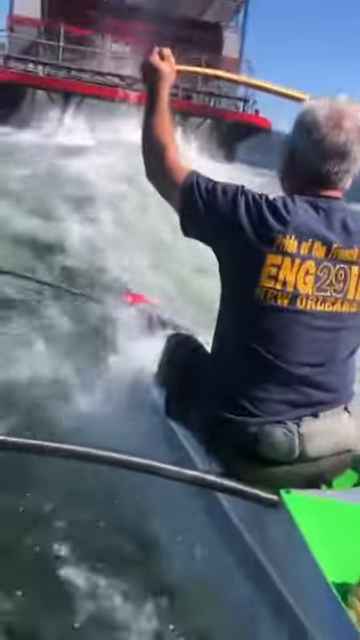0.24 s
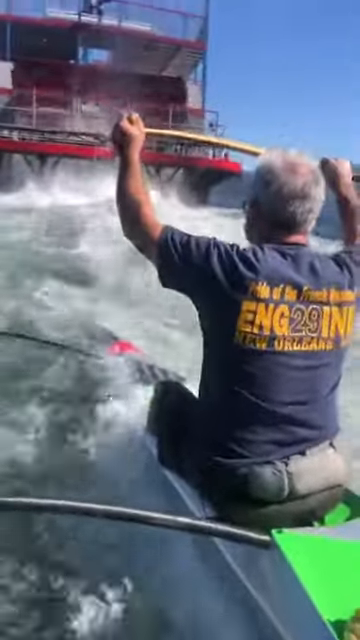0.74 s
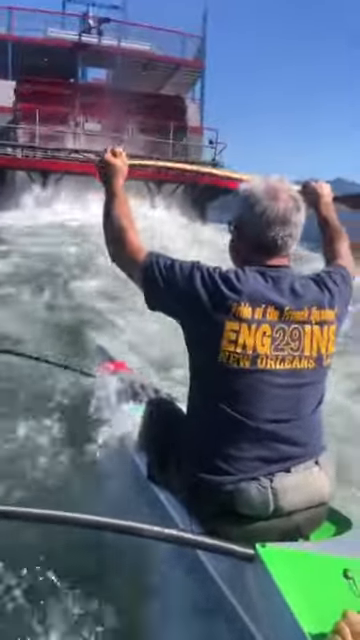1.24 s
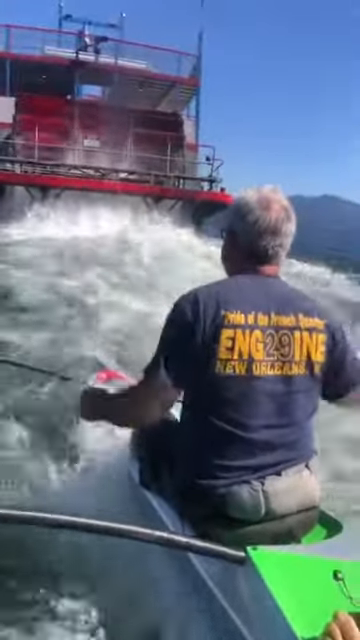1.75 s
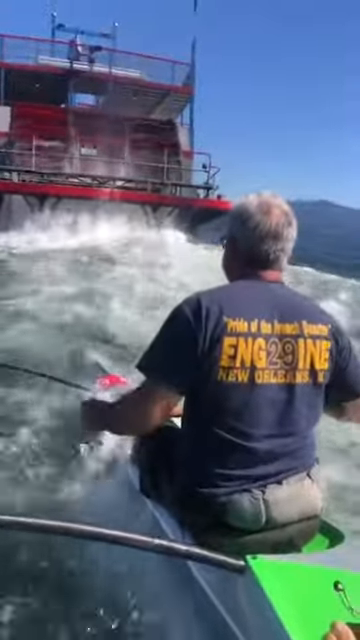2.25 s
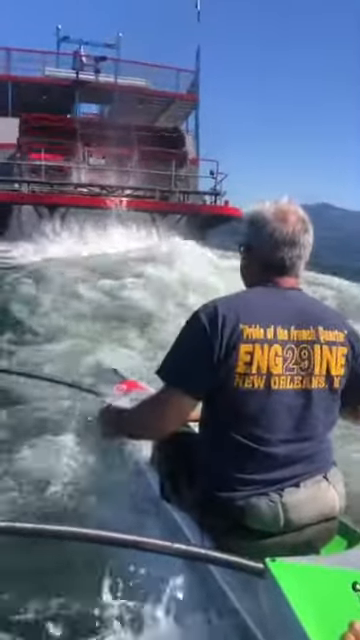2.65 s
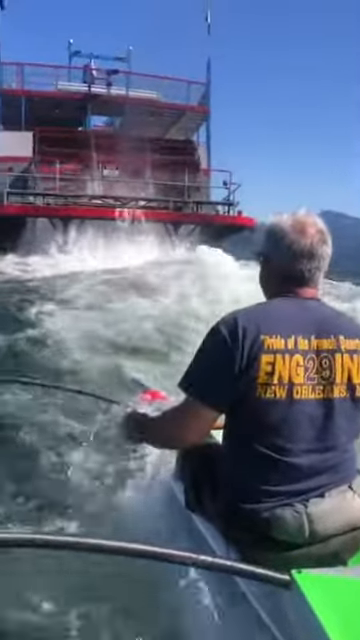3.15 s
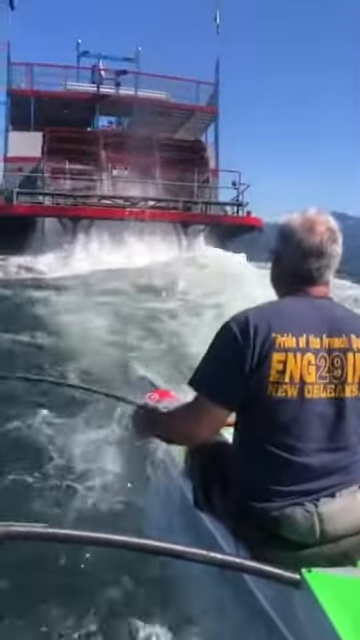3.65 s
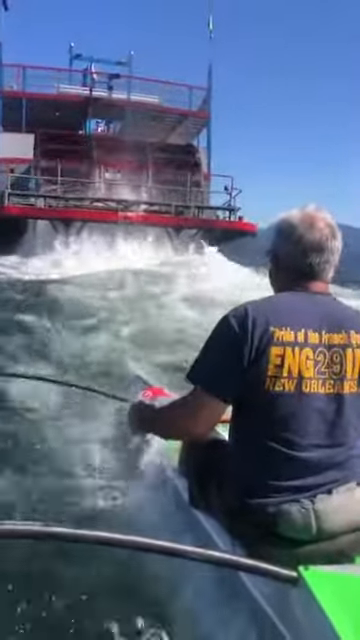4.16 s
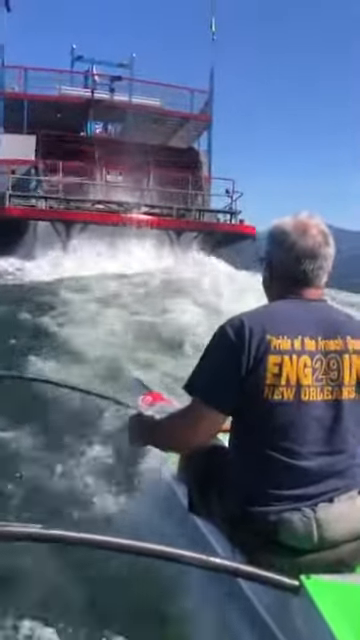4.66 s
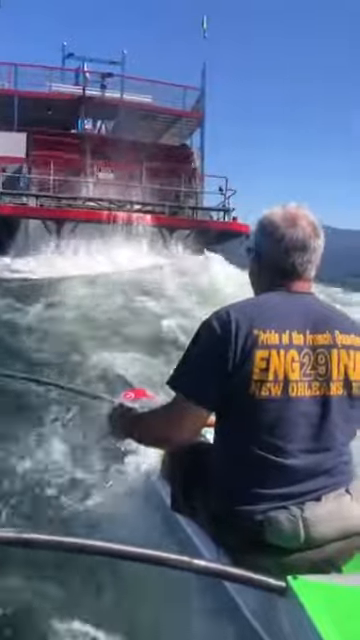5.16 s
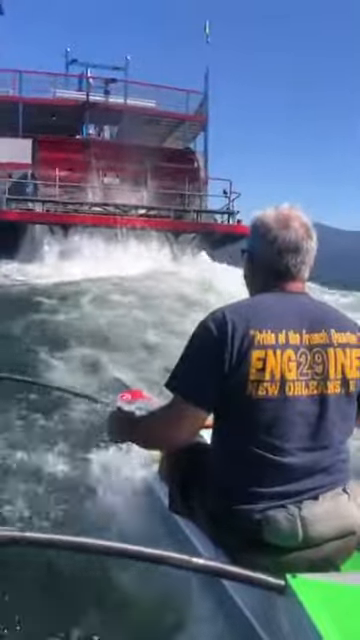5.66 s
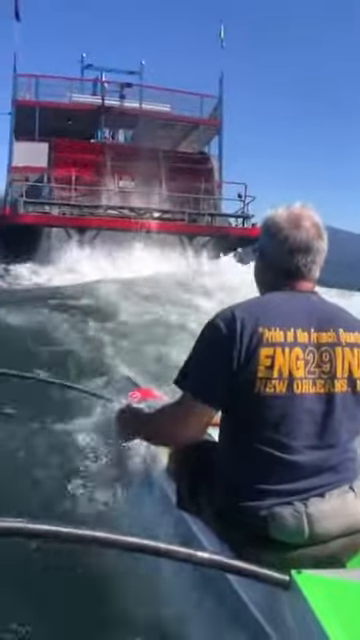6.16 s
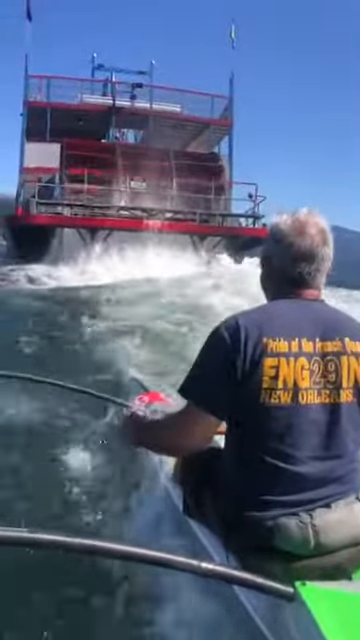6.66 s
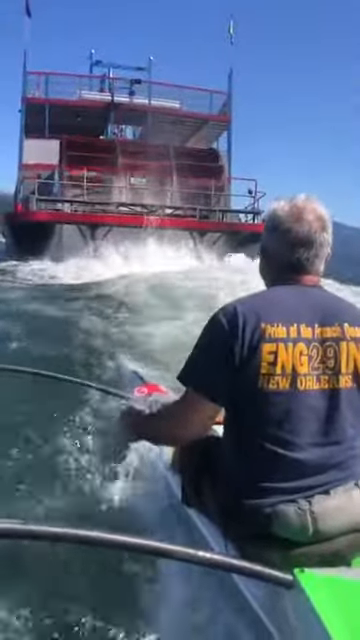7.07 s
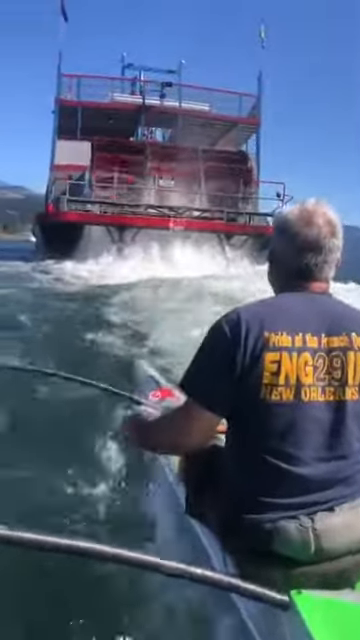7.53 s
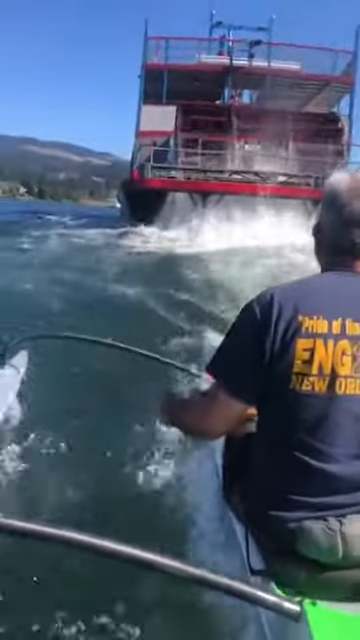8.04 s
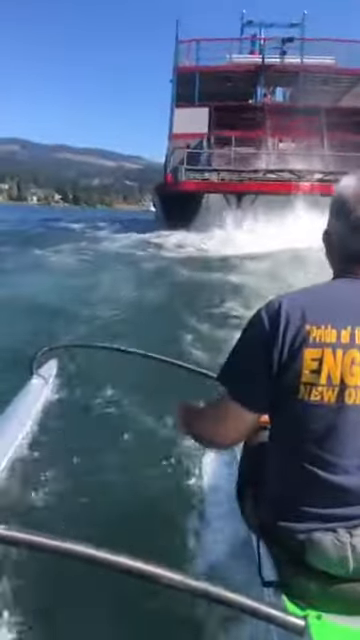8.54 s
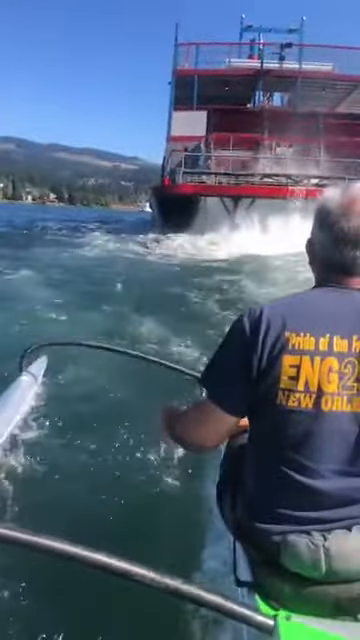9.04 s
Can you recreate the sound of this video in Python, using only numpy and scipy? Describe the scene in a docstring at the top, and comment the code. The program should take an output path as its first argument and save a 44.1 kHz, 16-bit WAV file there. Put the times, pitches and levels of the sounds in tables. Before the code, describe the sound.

Throughout about 9.3 seconds, a deep, steady diesel drone near 90 hertz swells and sags about 4.4 times a second, with brief dips, the deepest near 3.9. Paddlewheel wash rumbles low and roars broadly, with a thin hiss of falling drops; close by, the bow wave fizzes brightly and bubbles gurgle along the hull. A short lull at 1.6 leads into the largest crest around 2 to 2.2. A faint, fluttering pump hum near 205 hertz emerges from about 2.5 on. Dull hull slaps come at 0.1, 3.6 to 3.8, clustered from 4.4 to 4.9 with rougher gurgling, then 5.2, 7.1 and a low thump at 8. Tiny drop spits scatter until 6.9. Smaller crests rise near 5.2, 6.2 and 7.3. Roar and spray gradually weaken, leaving calmer water and the throbbing drone. Open air, mono, dry, top highs cut.

```python
"""On a river, an outrigger canoe rides the wake close behind a sternwheeler.
The ship's diesel, a stack of steady tones, throbs with every paddle of the wheel; a pump adds one wavering tone.
White water, made of filtered noise and ringing bubbles, roars at the stern and slowly draws away.
The bow wave fizzes in the same way, while short bursts of noise spit and slap on the canoe."""
import sys
import numpy as np
from scipy import signal
from scipy.io import wavfile
from scipy.ndimage import uniform_filter1d, minimum_filter1d

SR = 44100
rng = np.random.default_rng(int(sys.argv[2]) if len(sys.argv) > 2 else 0)


def to_wav(sig):
    """Store sig (one row per channel, or 1-D mono) as 16-bit WAV at the path in sys.argv[1].

    Samples outside -1..1 are clipped; the rate is SR.
    """
    pcm = np.clip(np.atleast_2d(sig), -1, 1) * 32767
    pcm = np.round(pcm).astype(np.int16)
    wavfile.write(sys.argv[1], SR, pcm.T)  # frames by channels


N = 410130
TIME = np.arange(N) / SR   # seconds

# The tones of the diesel exhaust. Each row: multiple of the crank speed, level in dB,
# throb in dB (how far the tone swells as the path opens; below zero it fades instead).
EXHAUST_TONES = [(2, -45, -8), (3, -11, 3), (5, -34.5, 3.5), (6, -40, -2.5), (7, -46, 3), (9, -47, 3.5),
                 (12, -71, 2)]
# Slow changes in the strength of the drone. Each row: time in seconds, change in dB.
DRONE_STRENGTH = [(0, -1.5), (.6, 0.1), (1.55, 0.3), (2.2, -0.6), (3.5, .6), (5.1, .2), (5.7, -0.7),
                  (6.5, .5), (7.15, -.5), (8.3, 0.8), (9.3, -0.2)]
# Brief dips in the strength of the drone. Each row: time of the dip in seconds, change in dB.
BRIEF_DIPS = [(0.019, -7.5), (.272, -5), (.738, -5), (1.41, -2), (1.87, -3), (2.32, -2.5), (3.93, -12),
              (4.855, -3), (7.16, -4.5), (7.38, -2)]
# The pump hum between its beats. Each row: time in seconds, pitch in Hz, level in dB.
PUMP_HUM = [(0, 204.8, -44), (.8, 205.6, -41), (1.7, 206.6, -37.5), (2.6, 205.6, -32.5), (3.6, 205.2, -35),
            (4.5, 206.3, -30.5), (5.9, 207.2, -32.5), (6.8, 206, -31), (7.5, 203.8, -31), (8.1, 205, -33.5),
            (8.8, 205.5, -28), (9.3, 206.3, -30.5)]
# Roughness of the water under the canoe. Each row: time in seconds, change from its usual state in dB.
CHOP_CURVE = [(0, -0.5), (1.5, -1.5), (2.6, -1.5), (3.2, 2), (4.15, 0), (4.75, 4.5), (5.5, -2.5), (7.15, 2),
              (8.0, 0.5), (8.6, -5), (9.3, -5)]
# Boils of wake water welling up with a deep rumble.
# Each row: time of the peak in seconds, length in seconds, lift of the churn in dB.
WAKE_BOILS = [(2.2, 0.11, 4.5), (2.92, 0.093, 6.5), (3.897, 0.094, 4), (4.56, .08, 6.5), (6.184, 0.06, 6.5),
              (6.92, .06, 4.5)]
# Crests breaking at the bow. Each row: time of the peak in seconds, length in seconds,
# lift of the spray in dB, lift of the roar in dB.
BOW_CRESTS = [(.3, 0.22, 2, 1), (0.756, 0.036, 3.5, -0.5), (1.125, 0.23, 2.5, 1), (1.96, 0.14, 5.3, 3),
              (2.19, 0.086, 4.5, 2.5), (2.6, 0.32, 1.5, 1.2), (3.78, 0.24, 1.6, 0), (4.646, .07, 3.5, .5),
              (5.246, 0.23, 2.5, 1), (5.753, .2, 2, .5), (6.19, 0.17, 4.5, 0.5), (6.62, 0.12, 1.8, 1),
              (6.917, .04, 2, 1.5), (7.29, 0.089, 0, 1.8), (7.92, .08, 1, 1.5), (8.23, 0.045, 2, .5)]
# Waves slapping the hull. Each row: time of the peak in seconds, level in dB, length in seconds,
# top of the noise band in Hz.
HULL_SLAPS = [(0.123, -29.5, .035, 480), (3.638, -26, 0.055, 360), (3.8, -29, 0.013, 400),
              (4.37, -29, .025, 430), (4.487, -26, .008, 450), (4.571, -22, 0.024, 680),
              (4.613, -25, 0.016, 480), (4.725, -28.5, 0.017, 480), (4.9, -33.5, 0.11, 430),
              (5.163, -30, .008, 520), (6.186, -37, 0.03, 220), (7.12, -30.5, .03, 380),
              (7.973, -23.5, 0.027, 260)]
# Spits of drops landing nearby. Each row: time of the peak in seconds, level in dB, length in seconds,
# pitch in Hz.
DROP_SPITS = [(.76, -37, .018, 8000), (1.075, -32, .006, 8500), (1.842, -33, .006, 11000),
              (2.066, -28, .004, 7000), (2.338, -30, .008, 6500), (2.444, -33, .009, 1900),
              (2.893, -27, .006, 1400), (3.494, -40, .004, 10000), (3.92, -42, .012, 12500),
              (4.984, -30, 0.0027, 7000), (5.218, -35, .005, 11000), (5.26, -30, .005, 1700),
              (5.636, -35, .004, 9200), (6.407, -34, .004, 12500), (6.918, -39, .012, 6500)]
# Tone colour of each kind of water. Each row: frequency in Hz, relative level in dB per Hz.
CHURN_SPECTRUM = [(18, -14), (28, -7), (42, 0), (60, 3), (85, 0), (120, -2), (170, -6), (230, -11.5),
                  (330, -36), (600, -40)]
ROAR_SPECTRUM = [(200, -19), (400, -0.5), (560, -.5), (720, -1), (1000, 1), (1200, -1), (1650, 1),
                 (1950, -2.5), (2300, -13.5), (3500, -13.5), (5300, -9.5), (8000, -14.5), (14000, -32)]
CURTAIN_SPECTRUM = [(450, -4.5), (620, 1.5), (900, -5), (3400, -26), (4400, -6), (4850, -2), (5300, 0),
                    (5900, -4), (6500, -10), (7600, -11), (9500, -19), (13000, -15)]
GURGLE_SPECTRUM = [(120, -2), (200, 2), (260, 1), (340, 0.5), (480, -6), (700, -22), (1400, -23)]
SPRAY_SPECTRUM = [(900, -7.5), (2200, -3.5), (3200, -4), (4200, -4.5), (5300, 1), (6500, -4.5), (7500, -4),
                  (8800, -9), (11500, -13), (13000, -10), (14500, -15.5), (16000, -20)]

ENGINE_HZ = 30.09   # crankshaft turns per second
PADDLES_PER_S, FIRST_PADDLE_S = 4.361, 0.16
# one turn of the wheel, the time when it leads most, and by how many paddles
WHEEL_TURN_S, WHEEL_AHEAD_S, WHEEL_LEAD_PADDLES = 3.8, 1.8, 0.04
DIP_S = 0.017   # half the length of a brief dip
PUMP_BEATS_PER_S, FIRST_BEAT_S = 1.9, 0.38
PUMP_BEAT_DB, PUMP_FLUTTER_DB = 2, 1.36   # how far the hum swings with each beat, and by chance
CHURN_DB, CHURN_FOLLOWS = -27.5, 1   # level at usual chop; share of the chop's swing
ROAR_DB, ROAR_FALL_DB_PER_S = -32.5, 0.38   # white water at the stern, drawing away
GURGLE_DB, GURGLE_FOLLOWS, GURGLE_FALL_DB_PER_S = -38, 1, 0.28   # along the hull, slowly declining
SPRAY_DB, SPRAY_FALL_DB_PER_S = -33, 0.76   # the bow wave, dying down as the wake gets calmer
LULL_S, LULL_LENGTH_S, LULL_DB = 1.58, 0.072, -3.5   # the water goes quiet before the biggest crest
LULL_ROAR_SHARE = 0.4   # share of that lull in the far roar
BUBBLE_CLUMP_DB = 3.0   # how much the rate of bubbles swings
CEILING, LIMITER_S = 0.8, 0.012   # peak size where the limiter steps in, and how long it holds
CUTOFF_HZ = 15750   # top of the sound


def diesel():
    """Six cylinders fire three times a turn; each passing paddle opens and bends the sound's path astern."""
    lead = WHEEL_LEAD_PADDLES * np.cos(2 * np.pi * (TIME - WHEEL_AHEAD_S) / WHEEL_TURN_S)
    paddle = 2 * np.pi * (PADDLES_PER_S * (TIME - FIRST_PADDLE_S) + lead)
    crank = 2 * np.pi * (ENGINE_HZ * TIME + 0.0086 * drift(0.38))
    # the path opens slowly, stays open a while and shuts quickly
    swing = np.cos(paddle - 0.2 * np.cos(paddle))
    opening = swing - 0.22 * (swing ** 2 - 0.5)
    tones = 0
    for multiple, level_db, throb_db in EXHAUST_TONES:
        bend = 0.051 * throb_db * np.sin(paddle)   # radians: the pitch sags as the level swells
        waver_db = 0.49 * abs(multiple - 3) * drift(3.0)   # tones away from the firing rate are less steady
        start = rng.uniform(0, 2 * np.pi)
        loudness = from_db(level_db + throb_db * opening + waver_db)
        tones = tones + loudness * np.sin(round(multiple) * crank - bend + start)
    strength_db, = in_time(DRONE_STRENGTH)
    dips_db = sum(db * swell(s, DIP_S) for s, db in BRIEF_DIPS)
    return np.sqrt(2) * from_db(strength_db + dips_db) * tones


def pump():
    """One wavering tone comes up out of the noise, beats slowly and flutters on its way through the spray."""
    hz, level_db = in_time(PUMP_HUM)
    beat_db = PUMP_BEAT_DB * np.cos(2 * np.pi * PUMP_BEATS_PER_S * (TIME - FIRST_BEAT_S))
    flutter_db = PUMP_FLUTTER_DB * drift(4.8)
    phase = 2 * np.pi * np.cumsum(hz) / SR + 0.31 * drift(6.1)
    return np.sqrt(2) * from_db(level_db + beat_db + flutter_db) * np.sin(phase)


def wake():
    """Heavy water tumbles off the wheel under a roar of foam; a curtain of drops hisses down behind it."""
    chop_db, = in_time(CHOP_CURVE)
    boils_db = sum(db * swell(s, length) for s, length, db in WAKE_BOILS)
    churn_db = CHURN_DB + CHURN_FOLLOWS * chop_db + boils_db
    churn = from_db(churn_db) * rush(CHURN_SPECTRUM, patchy_db=0.0, surge_db=0.6, rate=10.0)

    crests_db = sum(db * swell(s, length) for s, length, _, db in BOW_CRESTS)
    lull_db = LULL_ROAR_SHARE * LULL_DB * swell(LULL_S, LULL_LENGTH_S)
    roar_db = ROAR_DB - ROAR_FALL_DB_PER_S * TIME + crests_db + lull_db
    foam = rush(ROAR_SPECTRUM, patchy_db=0.82, surge_db=0.83, rate=11)
    foam_bubbles = bubbles(ROAR_SPECTRUM, 535, 1842, per_s=700, cycles=21, spread_db=1.5, count=36)
    roar = from_db(roar_db) * (foam + from_db(-6) * foam_bubbles)

    curtain = from_db(-40) * rush(CURTAIN_SPECTRUM, patchy_db=-1.0, surge_db=0.5, rate=12)
    return churn + roar + curtain


def bow_wave():
    """Big bubbles gurgle along the hull with the chop; fine ones fizz in the spray, which swells with the crests."""
    chop_db, = in_time(CHOP_CURVE)
    gurgle_db = GURGLE_DB + GURGLE_FOLLOWS * chop_db - GURGLE_FALL_DB_PER_S * TIME
    gurgle = rush(GURGLE_SPECTRUM, patchy_db=1.4, surge_db=2.5, rate=13)
    big_bubbles = bubbles(GURGLE_SPECTRUM, 219, 634, per_s=160, cycles=13.4, spread_db=1.5, count=14)
    gurgle = gurgle + from_db(-6) * big_bubbles

    crests_db = sum(db * swell(s, length) for s, length, db, _ in BOW_CRESTS)
    lull_db = LULL_DB * swell(LULL_S, LULL_LENGTH_S)
    spray_db = SPRAY_DB - SPRAY_FALL_DB_PER_S * TIME + crests_db + lull_db
    spray = rush(SPRAY_SPECTRUM, patchy_db=1.5, surge_db=0.8, rate=19)
    fine_bubbles = bubbles(SPRAY_SPECTRUM, 2370, 14700, per_s=4500, cycles=19, spread_db=4.5, count=30)
    spray = spray + from_db(-6) * fine_bubbles
    return from_db(gurgle_db) * gurgle + from_db(spray_db) * spray


def slaps():
    """A wave meeting the hull gives a dull, noisy thud."""
    thuds = 0
    for s, level_db, length, top_hz in HULL_SLAPS:
        noise = rms_one(band(rng.standard_normal(N), 120, top_hz, order=3))
        thuds = thuds + from_db(level_db) * burst(s, length) * noise
    return thuds


def spits():
    """A handful of drops lands, each with a short burst of noise around its own pitch."""
    drops = 0
    for s, level_db, length, hz in DROP_SPITS:
        noise = rms_one(band(rng.standard_normal(N), hz / 1.2, hz * 1.2))
        drops = drops + from_db(level_db) * burst(s, length) * noise
    return drops


def rush(spectrum, patchy_db, surge_db, rate):
    """Turbulent water: quarter-octave bands of noise that surge together and flicker each on its own."""
    edges = 16 * 2 ** (np.arange(41) / 4)
    water, white = 0, rng.standard_normal((2, N))
    for k, (low, high) in enumerate(zip(edges, edges[1:])):
        hz = np.sqrt(low * high)
        if spectrum[0][0] < hz < spectrum[-1][0]:
            flicker_db = patchy_db * drift(rate)
            noise = band(white[k % 2], low, high, order=3)   # neighbours use different noise
            water = water + noise * from_db(at_hz(spectrum, hz) + flicker_db)
    return rms_one(water * from_db(surge_db * drift(rate)))


def bubbles(spectrum, low_hz, high_hz, per_s, cycles, spread_db, count):
    """Bubbles of many sizes come in clumps; each rings for a few cycles at one of a set of pitches."""
    chance = per_s * from_db(BUBBLE_CLUMP_DB * drift(12)) / SR
    born = np.flatnonzero(rng.random(N) < chance)
    sizes = from_db(spread_db * np.minimum(rng.exponential(1, N), 4)) * rng.choice([-1, 1], N)
    pitch_number = rng.integers(0, count, N)
    fizz = 0
    for k, hz in enumerate(np.geomspace(low_hz, min(high_hz, CUTOFF_HZ), count)):
        clicks = np.full(N, 1e-18)
        own = born[pitch_number[born] == k]
        clicks[own] = sizes[own]
        r = from_db(-60 * hz / (cycles * SR))   # the ring falls 60 dB in this many cycles
        w = 2 * np.pi * hz / SR
        ring = signal.lfilter([1, 0, -1], [1, -2 * r * np.cos(w), r * r], clicks)
        fizz = fizz + rms_one(ring) * np.sqrt(hz) * from_db(at_hz(spectrum, hz))
    return rms_one(fizz)


def swell(s, length):
    """A smooth rise and fall of height 1 around s."""
    return np.exp(-np.minimum(((TIME - s) / length) ** 2, 50))


def burst(s, length):
    """A quick swell that peaks at s with height 1 and dies away."""
    age = np.maximum((TIME - s) / length * 2 + 1, 0)
    return age * np.exp(1 - np.minimum(age, 50))


def drift(rate):
    """Slow chance with spread 1, made of noise smoothed to keep what is slower than about rate in Hz."""
    r = np.exp(-80 * np.pi * rate / SR)   # one step is 40 samples
    noise = rng.standard_normal(N // 40 + 2002)
    slow = signal.lfilter([1], [1, -2 * r, r * r], noise)[2000:]   # skip the filter's start
    return np.interp(np.arange(N) / 40, np.arange(len(slow)), rms_one(slow))


def band(x, low, high, order=2):
    """Keep only what lies between two frequencies, with a Butterworth band-pass."""
    sos = signal.butter(order, [low, min(high, 0.48 * SR)], "band", fs=SR, output="sos")
    return signal.sosfilt(sos, x + 1e-18)


def at_hz(points, hz):
    """Read a spectrum on a log-frequency axis."""
    points = np.array(points)
    return np.interp(np.log(hz), np.log(points[:, 0]), points[:, 1])


def in_time(rows):
    """Draw each column of a table as a curve with a value at every sample."""
    s, *columns = np.transpose(rows)
    return [np.interp(TIME, s, column) for column in columns]


def from_db(db):
    """Turn decibels into gain."""
    return np.exp(np.asarray(db) * np.log(10) / 20)


def rms_one(x):
    """Scale to unit power."""
    return x / np.sqrt(np.mean(x ** 2) + 1e-20)


def scene():
    """Add all sources on open water, with no reverberation."""
    mix = diesel() + pump() + wake() + bow_wave() + slaps() + spits()
    return mix[None, :]


def record(dry):
    """A limiter eases peaks above the ceiling down; a steep filter cuts the top."""
    hold = int(LIMITER_S * SR)
    gain = minimum_filter1d(CEILING / np.maximum(np.abs(dry), CEILING), size=hold)
    limited = dry * uniform_filter1d(gain, size=hold)
    sos = signal.ellip(12, 0.1, 90, CUTOFF_HZ, fs=SR, output="sos")
    return signal.sosfilt(sos, limited)


dry = scene()
out = record(dry)
to_wav(out)
```